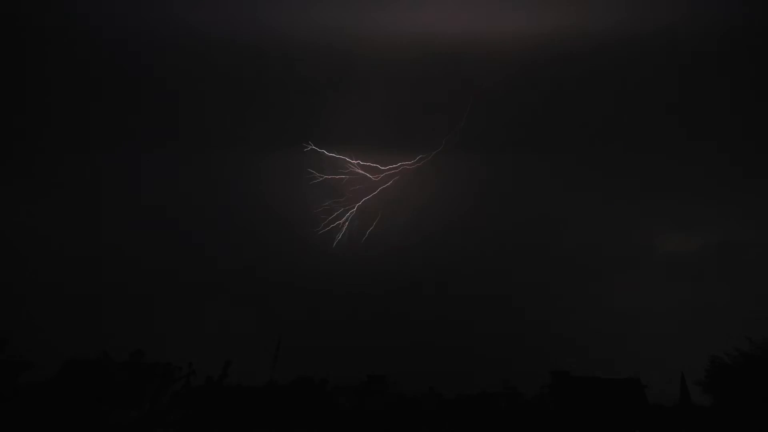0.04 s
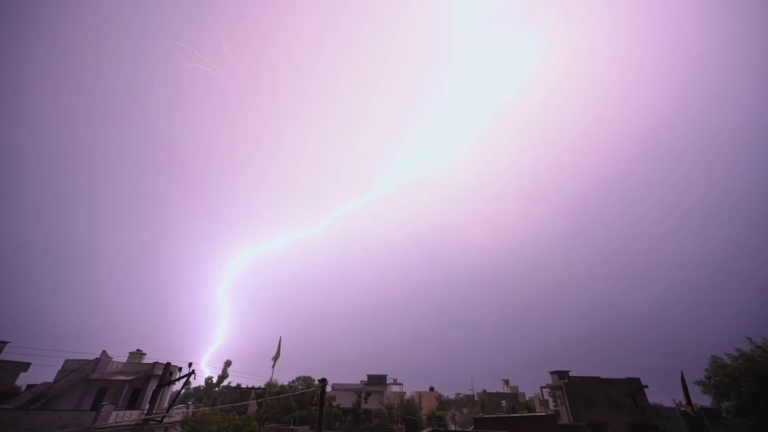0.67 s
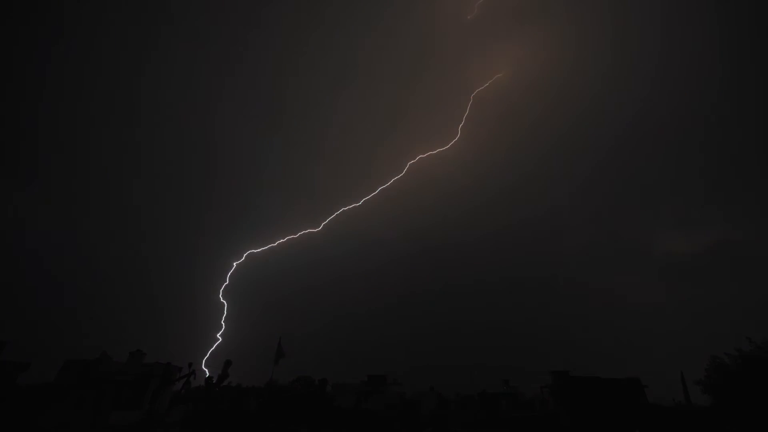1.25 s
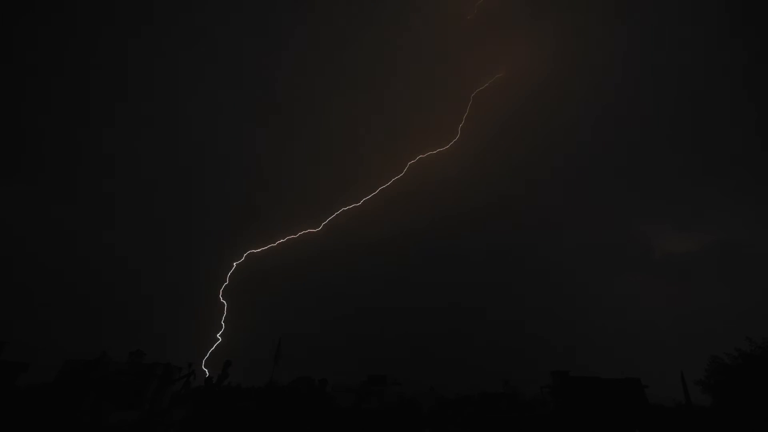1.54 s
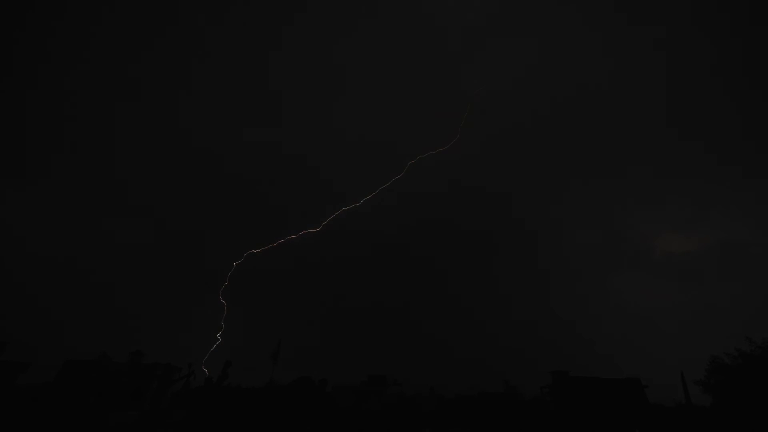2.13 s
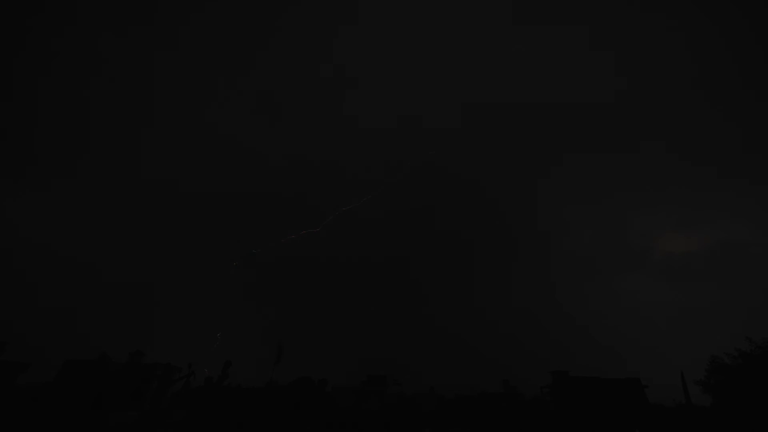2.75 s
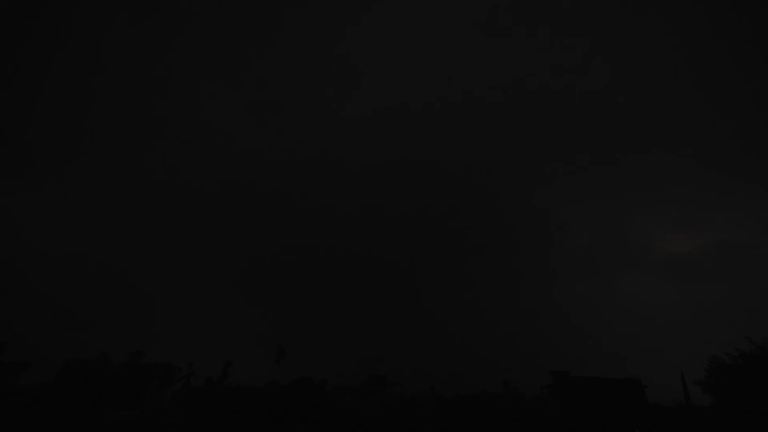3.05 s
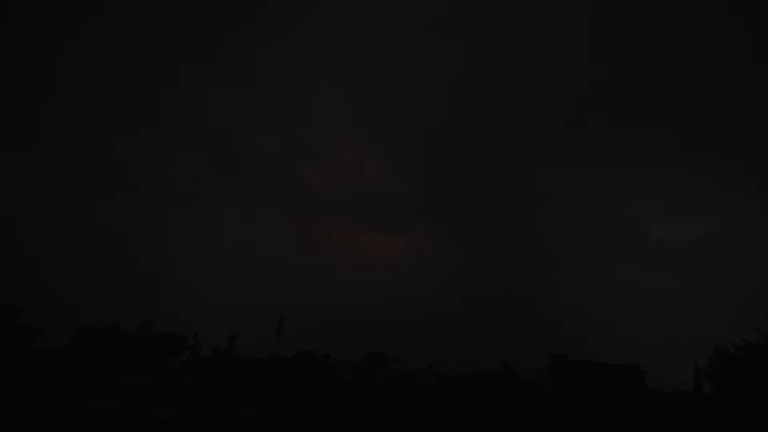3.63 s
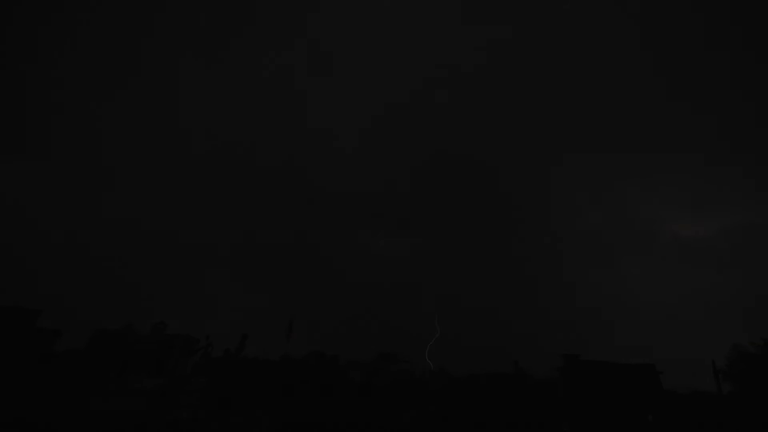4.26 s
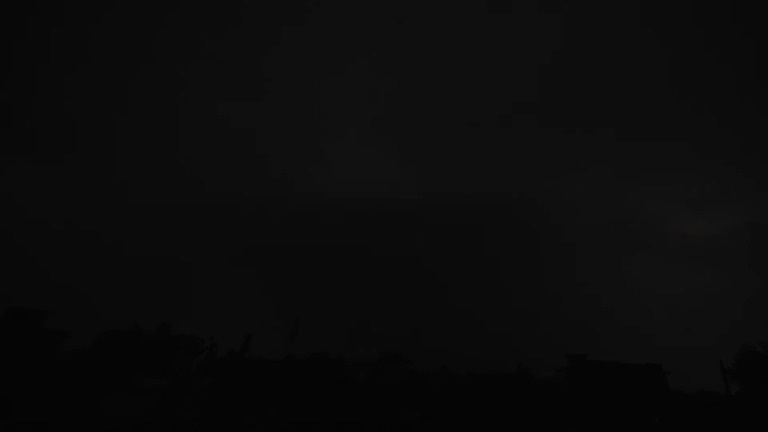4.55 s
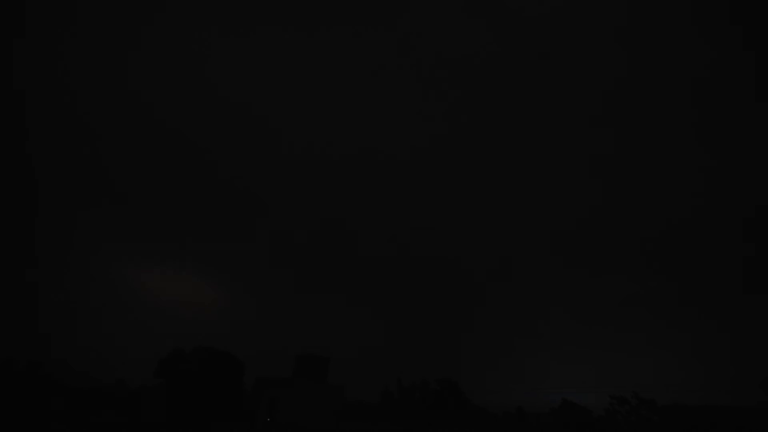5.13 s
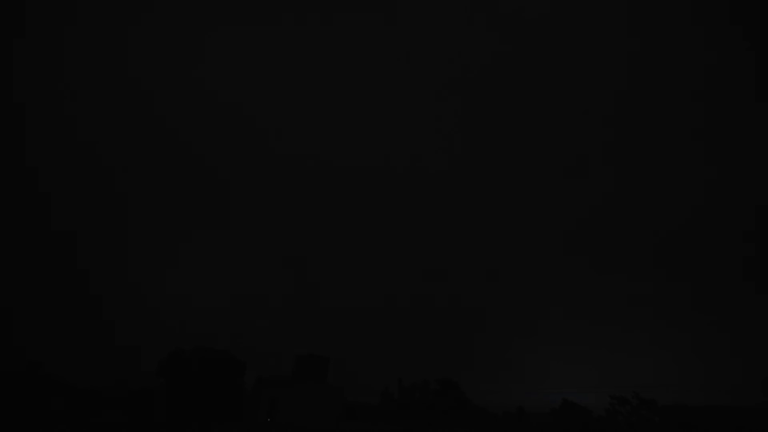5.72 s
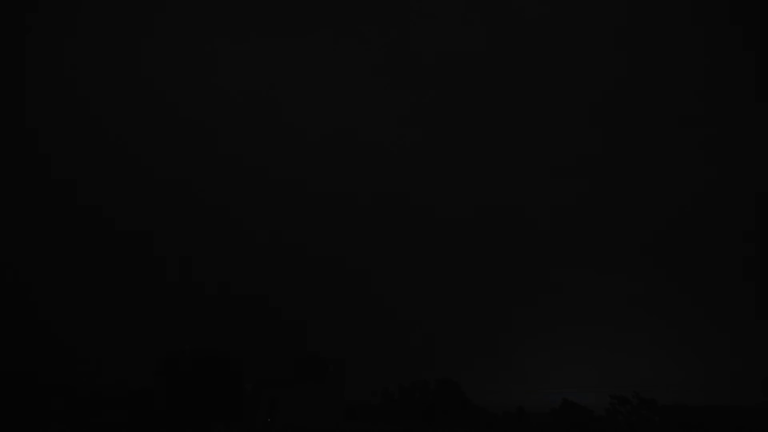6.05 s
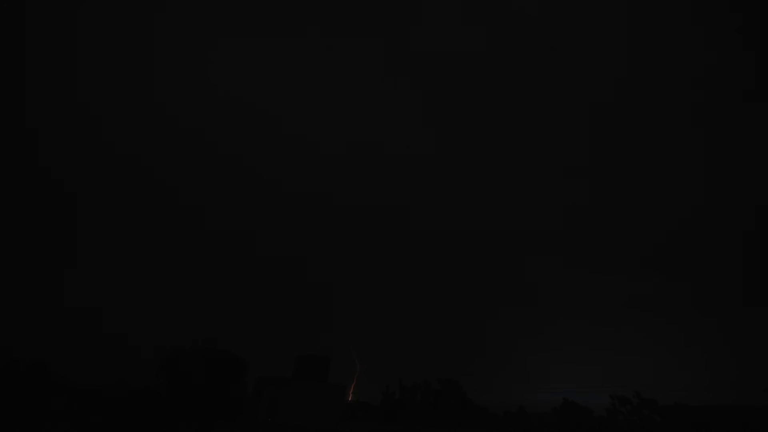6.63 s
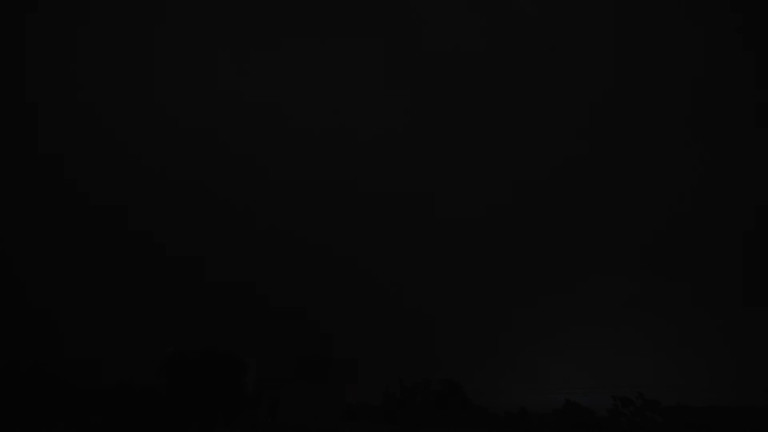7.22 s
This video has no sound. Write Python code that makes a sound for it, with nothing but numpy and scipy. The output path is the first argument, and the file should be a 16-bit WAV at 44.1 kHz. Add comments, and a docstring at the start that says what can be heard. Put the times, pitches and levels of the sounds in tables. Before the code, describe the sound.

Thunder rolls outdoors from the start, loud and slightly to the left, over a soft, steady hiss of rain and the dull murmur of a far storm. A cluster of claps peaks in a sharp crack at about 0.5 seconds, slapping back off houses. From 1 to 1.4 seconds a faint, high two-tone whistle trills once in the distance. Another clap lands at 1.9 seconds, followed by uneven booming peals with a tearing edge from 2.4 to 3.5 seconds. The thunder swells again around 4 seconds and delivers a second hard crack at 4.6. A deep, heavy peal with more claps arrives near 6.1 seconds, and a smaller one at 6.6. Single raindrops tick close by here and there throughout. At about 6.9 seconds the rumble falls to a low level and the sound narrows to the centre as the rain continues.

```python
"""Thunder rolls across the night sky, heard in the open in steady rain.
Shock waves from the crooked lightning channel arrive as a swarm: a low boom with a tearing edge.
The strongest land as sharp claps and slap back off houses, over the murmur of the far storm.
Rain hisses all round, a few drops tick close by, and a distant two-tone whistle trills once."""
import sys
import numpy as np
from scipy import signal
from scipy.fft import rfft, irfft, next_fast_len
from scipy.io import wavfile
from scipy.ndimage import uniform_filter1d, minimum_filter1d

SR = 44100
rng = np.random.default_rng(int(sys.argv[2]) if len(sys.argv) > 2 else 0)


def store_wav(level_fs):
    """Save 16-bit WAV to argv[1]."""
    pcm = np.round(np.clip(np.atleast_2d(level_fs), -1, 1) * 32767)
    wavfile.write(sys.argv[1], SR, pcm.T.astype(np.int16))


N = 321039
TIME = np.arange(N) / SR
CONTROL_TIME = np.arange(0, N, 40) / SR   # coarse grid for the thunder's envelopes

# stereo width of the roll, far storm and rain: (time [s], width [0-1])
STORM_WIDTH = [(0, 1), (6.86, 0.95), (6.93, 0), (7.28, 0.1)]
# rumble bed that lingers between peals: (time [s], boom level [dB], tear level [dB])
RUMBLE_BED = [(0, -27.5, -36), (1.1, -32, -40), (2.3, -27, -35), (3.3, -24.5, -33), (3.8, -29.5, -38),
              (5.0, -28, -40), (5.7, -34, -43), (6.25, -27.5, -42), (6.89, -29.5, -40.5),
              (6.94, -43.5, -51.5), (7.28, -38, -48.5)]
# peals, one for each stretch of the lightning channel:
# (time [s], hold [s], boom level [dB], tear level [dB], bass shelf [dB])
PEAL_CUES = [(0.05, .7, -24, -37.5, 1.5), (0.376, 0.086, -15.5, -32.5, 2), (0.839, 0.13, -26.5, -34.5, -5),
             (1.093, 0.18, -28, -38, -5), (1.65, 0.13, -30, -39.5, 0.5), (1.87, 0.08, -18.5, -33.5, -4.5),
             (2.437, 0.071, -18, -35.5, 0.5), (2.572, 0.079, -22, -33, -2.5), (2.758, 0.17, -23, -31.5, -3),
             (2.98, .26, -27.5, -38, -12), (3.359, 0.15, -22, -35.5, -8), (4.055, 0.025, -24, -32.5, 5),
             (4.118, 0.14, -24.5, -39.5, 2), (4.537, 0.2, -22, -33.5, 7), (4.804, 0.058, -17.5, -29.5, 1),
             (5.861, 0.075, -31.5, -39, 17), (6.107, 0.044, -17, -28, 9), (6.606, 0.078, -26.5, -38.5, 8.5)]
# tone of the thunder's low body: (frequency [Hz], relative level [dB])
BOOM_SPECTRUM = [(12, -15.5), (25, -6), (50, -2.5), (120, 4), (220, 2), (300, -6.5), (420, -20), (700, -41),
                 (1400, -84), (4000, -110)]
# tone of its tearing edge: (frequency [Hz], relative level [dB])
TEAR_SPECTRUM = [(150, -16), (300, 4), (430, 0), (650, -4.5), (950, -11), (1300, -22.5), (1800, -35),
                 (3000, -46.5), (8000, -67), (16000, -86)]
# air dulls the tear as it arrives from further along the channel: (time [s], treble shelf [dB])
TEAR_BRIGHTNESS = [(1.5, 5.5), (3.0, -1.5), (6.1, -2)]
# the side the thunder comes from: (time [s], left over right [dB])
THUNDER_PAN = [(0.0, 1.5), (0.2, 3.5), (1.38, 2.5), (1.99, 4), (2.13, 0.5), (2.45, 1.5), (3.06, -1.5),
               (4.05, 1.5), (7.28, 0.0)]
# tone of the distant murmur: (frequency [Hz], relative level [dB])
FAR_STORM_SPECTRUM = [(20, -3.5), (60, -2), (130, -5), (300, 3), (500, -1), (850, -10), (1350, -11),
                      (1750, -28.5), (3000, -55.5)]
# tone of the rain's hiss: (frequency [Hz], relative level [dB])
RAIN_SPECTRUM = [(600, -1.5), (1500, 3), (2200, 2.5), (3000, 2.5), (4000, -4), (5100, -9), (6000, -16.5),
                 (8000, -17.5), (11000, -23), (15500, -32)]
# close raindrops: (time [s], level [dB], pitch [Hz], splash t60 [s])
DROP_HITS = [(.233, -47, 5200, .03), (.618, -50, 5100, .055), (1.070, -45, 4840, .02),
             (1.277, -43, 2100, 0.049), (1.455, -49, 12400, 0.018), (1.762, -48, 3600, 0.068),
             (2.579, -39.5, 2160, .037), (2.875, -45, 3200, 0.05), (3.165, -48.5, 5140, .071),
             (3.3355, -45, 9000, 0.0007), (3.486, -49, 14600, .02), (3.541, -44, 2670, .05),
             (4.003, -43.5, 6100, .025), (4.203, -36, 1980, .032), (4.462, -41.5, 2200, 0.066),
             (4.730, -48, 6400, 0.035), (4.783, -40, 3500, .057), (4.948, -43, 6200, 0.0053),
             (6.588, -37, 4130, 0.012), (6.622, -45, 5200, .02)]
# single strong shocks: (time [s], level [dB], pitch [Hz])
CLAP_HITS = [(0.2774, -12.5, 147), (0.3843, -9, 163), (0.4176, -8, 142), (0.452, 0.5, 161),
             (0.5627, -10, 182), (0.6584, -8.5, 166), (0.848, -9.5, 186), (0.929, -11.5, 169),
             (1.8803, -4.5, 167), (2.456, -9.5, 146), (2.4872, -9.5, 132), (2.747, -9.5, 186),
             (2.7739, -12.5, 194), (2.9191, -10.5, 224), (3.1888, -12.5, 195), (3.2401, -12, 177),
             (3.4381, -13, 153), (3.9387, -10, 180), (3.98, -12.5, 157), (4.1278, -13.5, 155),
             (4.4132, -10.5, 164), (4.612, 1.5, 165), (4.678, -7.5, 98.6), (4.8075, -9, 129),
             (4.8646, -12.5, 183), (5.9148, -15.5, 109), (6.1171, -6, 146), (6.1477, -7, 179),
             (6.159, -8, 134)]
# slapback off the ground and houses: (delay [s], level [dB])
SLAPBACKS = [(.0045, -11.5), (.0095, -20), (0.04, -16), (0.067, -31)]
# shock fronts steep enough to crack: (time [s], level [dB])
CRACK_HITS = [(0.453, -29), (1.884, -40), (4.616, -31), (6.147, -45)]
# envelope of the whistle's blast: (time [s], level [dB])
WHISTLE_BLAST = [(.95, -81), (.978, -42.5), (1.02, -49), (1.12, -43.5), (1.26, -46.5), (1.315, -40),
                 (1.345, -51), (1.37, -75.5)]
# the whistle's two chambers: (base pitch [Hz], level [dB], attack [s])
WHISTLE_CHAMBERS = [(2783, 1, .005), (3155, -7.5, .08)]


def from_db(db):
    """Decibels to gain."""
    return 10 ** (np.asarray(db) / 20)


def rms_one(x):
    """Scale to rms 1."""
    return x / np.sqrt(np.mean(x ** 2) + 1e-20)


def automation(rows):
    """A (time, value) curve read at every sample."""
    return np.interp(TIME, *np.transpose(rows))


def drift(rate_hz):
    """Smooth random wobble, rms 1."""
    step, run_in = 40, 2000
    pole = np.exp(-2 * np.pi * rate_hz * step / SR)
    noise = rng.standard_normal(N // step + run_in + 2)
    slow = signal.lfilter([1], [1, -2 * pole, pole * pole], noise)[run_in:]
    return np.interp(np.arange(N) / step, np.arange(len(slow)), rms_one(slow))


def cut(x, hz, kind, order=2):
    """Butterworth low- or high-pass."""
    return signal.sosfilt(signal.butter(order, hz, kind, fs=SR, output="sos"), x + 1e-18)


def zero_phase(x, hz, kind):
    """Low- or high-pass run forwards and backwards, so nothing is delayed."""
    return cut(cut(x, hz, kind)[..., ::-1], hz, kind)[..., ::-1]


def shelf(x, hz, kind, db):
    """Boost or dip the lows or highs."""
    return x + (from_db(db) - 1) * zero_phase(x, hz, kind)


def ring(x, hz, q):
    """A single resonance."""
    return signal.lfilter(*signal.iirpeak(hz, q, fs=SR), x)


def colour(x, spectrum):
    """Give x a spectrum, rms 1; a click becomes a two-sided pressure pulse."""
    size = next_fast_len(N)
    hz, db = np.transpose(spectrum)
    log_hz = np.log(np.arange(size // 2 + 1) * SR / size + 1)
    gain = from_db(np.interp(log_hz, np.log(hz), db))
    return rms_one(irfft(rfft(x, size) * 1j * gain, size)[..., :N])


def clicks(per_s, size_db):
    """Clicks at random moments, of random sign and uneven size."""
    sizes = from_db(size_db * np.clip(rng.standard_normal(N), -2, 2)) * rng.choice([-1, 1], N)
    return rms_one(sizes * (rng.random(N) < per_s / SR))


def stereo(mid, side, side_db):
    """Direct sound in the middle, scattered sound to the sides."""
    return mid + from_db(side_db) * automation(STORM_WIDTH) * side * np.array([[1], [-1]])


def wide_noise(side_db):
    """White noise spread round the listener."""
    return stereo(*rng.standard_normal((2, N)), side_db)


def outdoors(x, t60, onset_s):
    """Diffuse stereo reverb of trees and walls, as loud as its source."""
    t = TIME[:SR * 2]
    tail = rng.standard_normal((2, len(t))) * from_db(-60 * t / t60) * (1 - np.exp(-t / onset_s))
    tail /= np.sqrt(np.sum(tail ** 2, axis=1, keepdims=True))
    return signal.fftconvolve(x[None], tail, axes=1)[:, :N]


def swell(full_at, db, attack_s, hold_s, release_s):
    """Power envelope that rises to its full level, holds, then dies away."""
    early = np.maximum(full_at - CONTROL_TIME, 0)
    late = np.maximum(CONTROL_TIME - full_at - hold_s, 0)
    return (from_db(db) * np.exp(-(early / attack_s) ** 2 - late / release_s)) ** 2


def thunder_envelopes(attack_s=.031):
    """Rumble, peals and shock clusters add in power, giving boom gain, tear gain and bass shelf in dB."""
    times, *levels = np.transpose(RUMBLE_BED)
    boom, tear = (from_db(np.interp(CONTROL_TIME, times, db)) ** 2 for db in levels)
    weighted_bass = 0
    for at, hold_s, boom_db, tear_db, bass_db in PEAL_CUES:
        peal = swell(at, boom_db, attack_s, hold_s, release_s=.074)
        boom += peal
        weighted_bass += peal * bass_db
        tear += swell(at, tear_db, attack_s, hold_s, release_s=.063)
    for at, db, _ in CLAP_HITS:   # small shocks crowd round each strong one
        boom += swell(at, db - 9, attack_s=.0027, hold_s=.0074, release_s=.0068)
    curves = np.sqrt(boom), np.sqrt(tear), weighted_bass / boom
    return [np.interp(TIME, CONTROL_TIME, curve) for curve in curves]


def swarm(spectrum, per_s, size_db, side_db, even_s):
    """Countless small shocks from the kinks of the channel, levelled over even_s."""
    shocks = colour(stereo(clicks(per_s, size_db), clicks(per_s * 2, size_db), side_db), spectrum)
    power = uniform_filter1d(shocks.mean(0) ** 2, int(even_s * SR) + 1)
    return shocks / np.sqrt(power + 1e-4)


def roll(side_db):
    """Far parts of the channel boom; nearer ones keep a tearing edge. Both lurch a little at random."""
    boom_gain, tear_gain, bass_db = thunder_envelopes()
    boom = swarm(BOOM_SPECTRUM, per_s=900, size_db=2, side_db=side_db, even_s=.05)
    tear = swarm(TEAR_SPECTRUM, per_s=1600, size_db=2.5, side_db=side_db, even_s=.046)
    boom = boom_gain * shelf(boom, 99, "low", bass_db)
    tear = tear_gain * shelf(tear, 1100, "high", automation(TEAR_BRIGHTNESS))
    lurch = from_db(1.42 * drift(rate_hz=9))
    return lurch * (from_db(-2) * boom + from_db(1.5) * tear)


def thunder(mono_below_hz=55):
    """Roll, claps and cracks move across the sky; the longest waves reach both sides alike."""
    pan_db = automation(THUNDER_PAN)
    scatter_db = -11.2 + 1.3 * pan_db   # the further left, the more arrives by reflection
    pan = from_db(pan_db * np.array([[.5], [-.5]]))
    left, right = (roll(scatter_db) + claps() + cracks()) * pan
    side = zero_phase((left - right) / 2, mono_below_hz, "high")
    return (left + right) / 2 + side * np.array([[1], [-1]])


def far_storm():
    """The dull, even murmur of the storm far away."""
    return from_db(-42.5) * colour(wide_noise(side_db=-8.5), FAR_STORM_SPECTRUM)


def rain(splash_s=.0037, ledge_hz=5150, ledge_width_hz=260):
    """Far drops merge into a hiss; nearer ones patter out of it, each with a short splash."""
    hiss = colour(wide_noise(side_db=-8.5), RAIN_SPECTRUM) * from_db(1.1 * drift(rate_hz=19))
    spray = colour(wide_noise(side_db=8.5), RAIN_SPECTRUM)
    spray = cut(cut(spray, 4500, "high"), 9500, "low")
    patter = 0
    for hz in np.geomspace(1900, 7000, num=5):   # leaves, soil and ledges each splash at their own pitch
        impacts = clicks(per_s=40, size_db=3.6) ** 2
        power = signal.lfilter([1], [1, -np.exp(-1 / (splash_s * SR))], impacts)
        splash = wide_noise(side_db=0) * np.sqrt(power + 1e-18)
        splash = cut(cut(splash, hz * 1.02, "low"), hz / 1.3, "high")
        patter += rms_one(splash) * (hz / 2000) ** -1.3
    # the last, finest splashes set a metal ledge ringing
    ledge = rms_one(ring(splash, ledge_hz, q=ledge_hz / ledge_width_hz))
    ticks = stereo(clicks(per_s=14, size_db=6), clicks(per_s=14, size_db=6), side_db=-14)
    ticks = cut(ticks, 4000, "high")
    return (from_db(-56) * hiss + from_db(-69.5) * spray + from_db(-66) * patter
            + from_db(-77.5) * ledge + from_db(-84.5) * ticks)


def drops(ring_width_hz=480, splash_db=-10):
    """A close drop splashes briefly on a leaf or ledge, which colours it; fat drops are dull."""
    track = np.zeros(N)
    t = TIME[:SR // 10]
    for at, db, hz, t60 in DROP_HITS:
        burst = rng.standard_normal(len(t)) * from_db(-60 * t / t60)
        splash = cut(burst, hz * 1.1, "low", order=4)
        tick = ring(splash, hz, q=hz / ring_width_hz) + from_db(splash_db) * splash
        start = int(at * SR)
        track[start:start + len(t)] += from_db(db) * tick / np.abs(tick).max()
    return track + from_db(-9) * outdoors(track, t60=.15, onset_s=.003)


def claps(steepness=1.73, taper=.71):
    """Each strong shock is a trough that snaps into a crest; the stronger, the steeper its front."""
    direct = np.zeros(N)
    for at, db, hz in CLAP_HITS:
        span = slice(int((at - .015) * SR), int((at + .015) * SR))
        phase = 2 * np.pi * hz * (TIME[span] - at)
        front = np.tanh(phase * steepness * from_db(db / 2))
        pulse = front * np.exp(-(phase / 2) ** 2 * taper)
        direct[span] += from_db(db) * pulse / pulse.max()
    direct = cut(direct, 32, "high", order=1)
    thud = cut(direct, 260, "low")   # reflections keep only the low end
    echoes = sum(from_db(db) * np.interp(TIME - delay, TIME, thud) for delay, db in SLAPBACKS)
    return direct + echoes + from_db(-5.5) * outdoors(thud, t60=.21, onset_s=.0056)


def cracks(decay_s=.0016, edge_db=-19):
    """The steepest fronts smack briefly in the mids, with a thin bright edge."""
    envelope = sum(from_db(db) * np.exp(-np.abs(TIME - at) / decay_s) for at, db in CRACK_HITS)
    noise = rng.standard_normal(N)
    mids = rms_one(cut(cut(noise, 2200, "low", order=4), 500, "high"))
    smack = envelope * (mids + from_db(edge_db) * noise)
    return smack + from_db(-7) * outdoors(smack, t60=.12, onset_s=.003)


def whistle(trill_hz=26, choke=.47, flick_hz=45, jitter_hz=10):
    """Two chambers sound together; each turn of the trill chokes them and flicks the pitch up."""
    start, speaks_at, *_, end = (at for at, _ in WHISTLE_BLAST)
    blast = from_db(automation(WHISTLE_BLAST)) * (TIME > start) * (TIME < end)
    tone_age = np.maximum(TIME - speaks_at, 0)
    trill_phase = 2 * np.pi * np.cumsum(trill_hz + 4 * drift(rate_hz=10)) / SR
    turn = (.5 + .5 * np.sin(trill_phase)) ** 4
    tones, phases = 0, []
    for hz, db, attack_s in WHISTLE_CHAMBERS:
        pitch_hz = hz + flick_hz * turn + jitter_hz * drift(rate_hz=120)
        phases.append(2 * np.pi * np.cumsum(pitch_hz) / SR)
        attack = 1 - np.exp(-tone_age / attack_s)
        tones += from_db(db + 2 * drift(rate_hz=70)) * attack * np.sin(phases[-1])
    low, high = phases
    tones += from_db(-21.5) * sum(np.sin(high + k * (high - low)) for k in (2, 3))   # faint sidebands
    rasp = cut(rng.standard_normal(N), 2830, "high", order=8)   # air rasps on the lip
    rasp = rms_one(cut(rasp, 2950, "low", order=8))
    call = blast * (tones * (1 - choke * turn) + from_db(-10.5) * rasp)
    air = from_db(-26) * blast * cut(rng.standard_normal(N), 2500, "high")
    return call + air + from_db(-9.5) * outdoors(call, t60=2.4, onset_s=.02)[0]


def scene():
    """Thunder up front, over a bed of far storm and rain, with close drops and one whistle."""
    return thunder() + far_storm() + rain() + drops() + whistle()


def record(dry, ceiling=.95, cutoff_hz=15700):
    """A limiter holds the loudest peaks down, then a steep low-pass trims the top."""
    safe_gain = np.minimum(1, ceiling / (np.abs(dry).max(0) + 1e-9))
    held_gain = minimum_filter1d(safe_gain, size=441)
    smooth_gain = uniform_filter1d(uniform_filter1d(held_gain, size=220), size=220)
    low_pass = signal.ellip(12, .1, 90, cutoff_hz, fs=SR, output="sos")
    return signal.sosfilt(low_pass, dry * smooth_gain)


dry = scene()
out = record(dry)
store_wav(out)
```